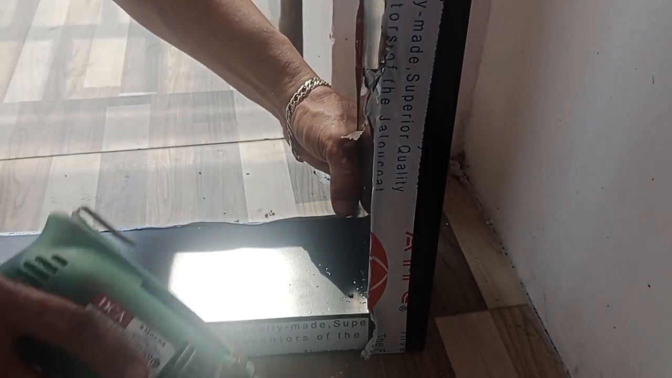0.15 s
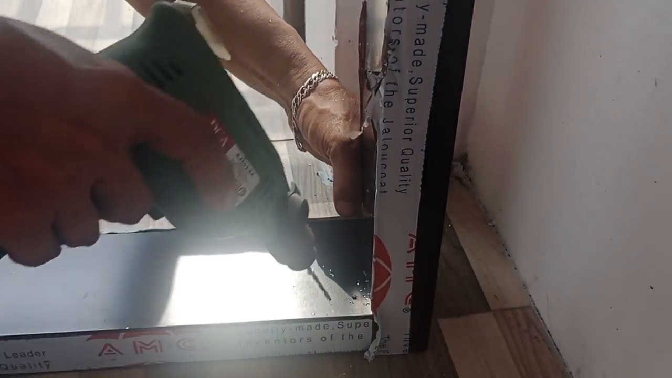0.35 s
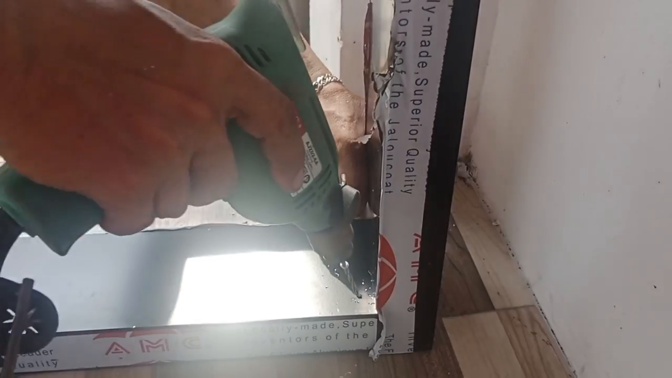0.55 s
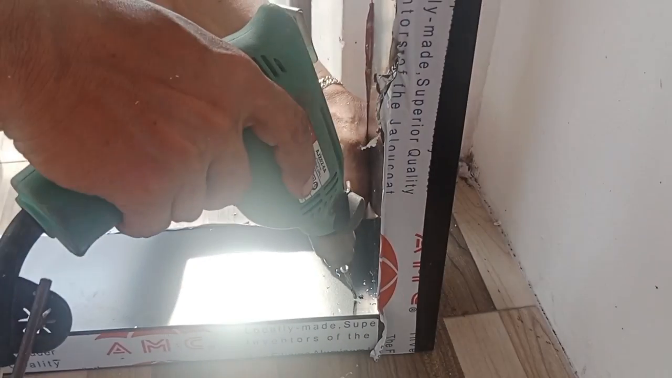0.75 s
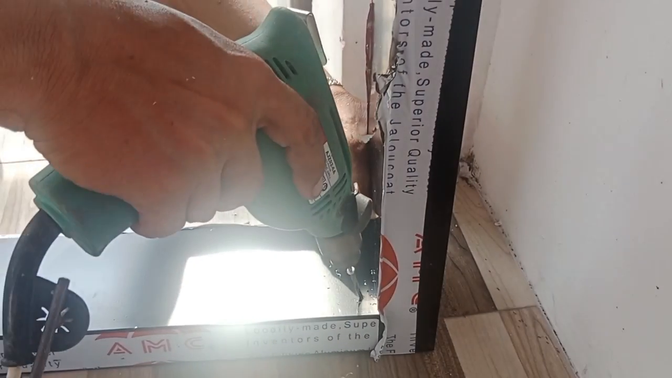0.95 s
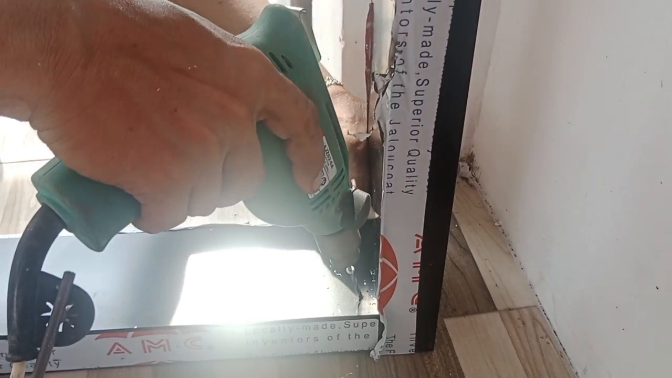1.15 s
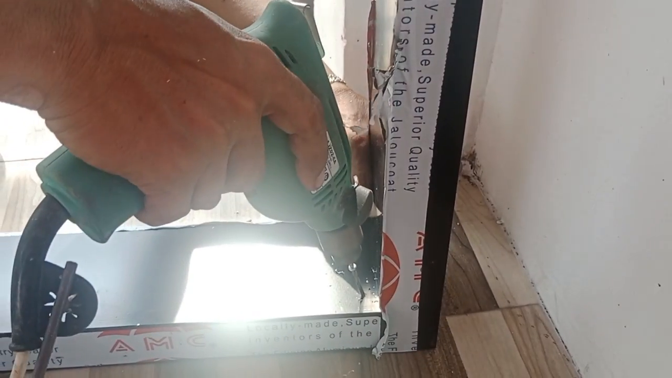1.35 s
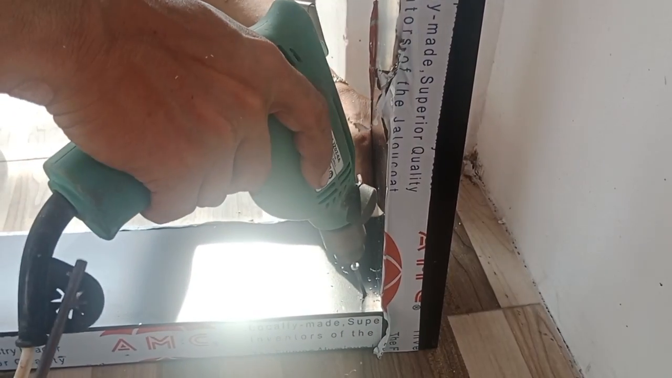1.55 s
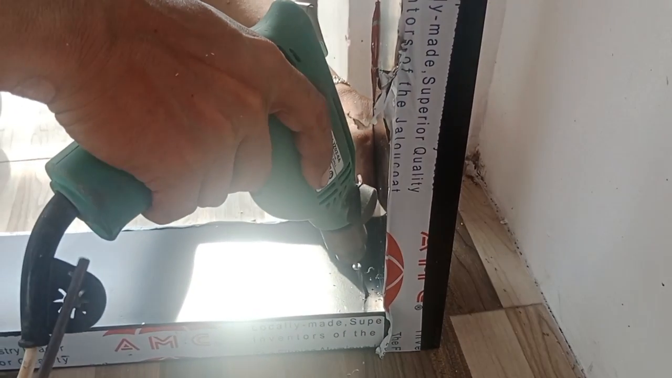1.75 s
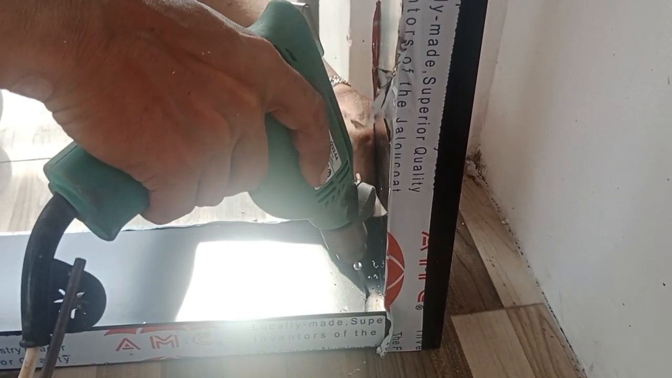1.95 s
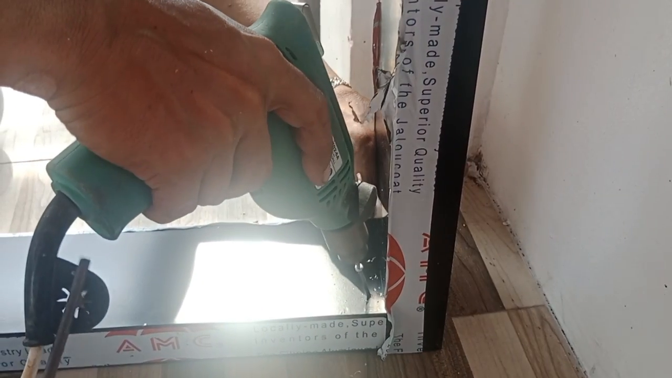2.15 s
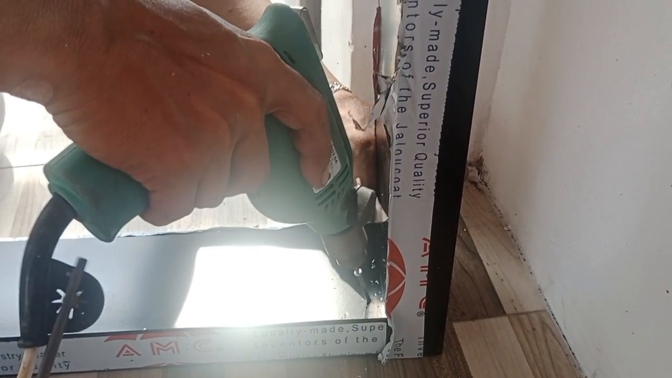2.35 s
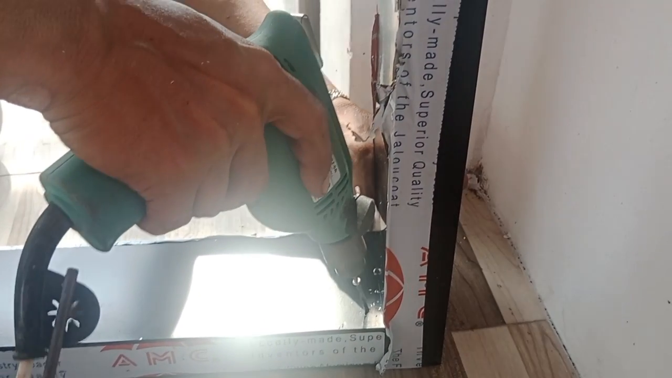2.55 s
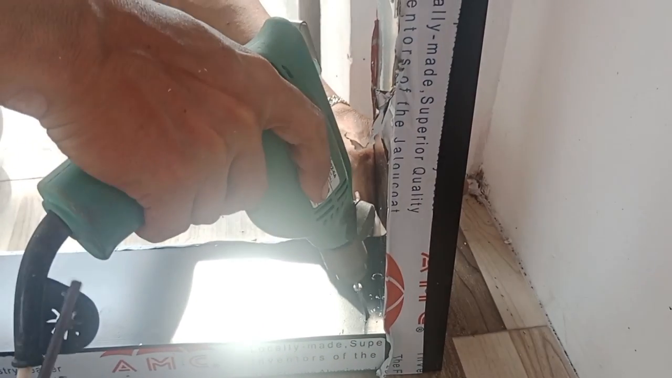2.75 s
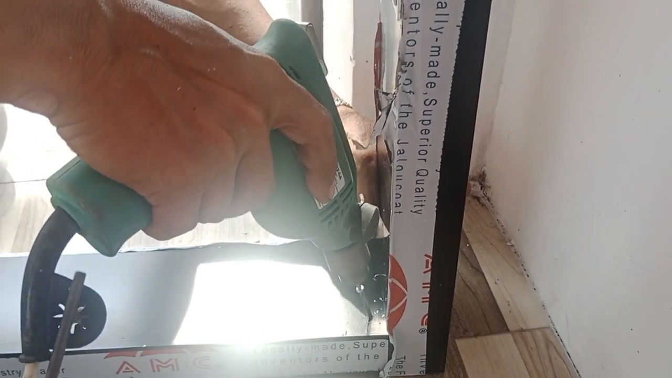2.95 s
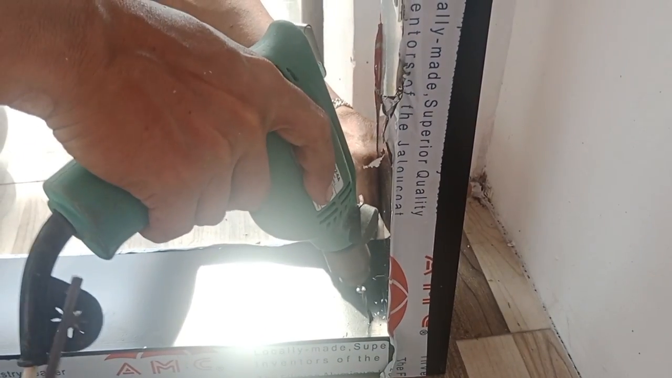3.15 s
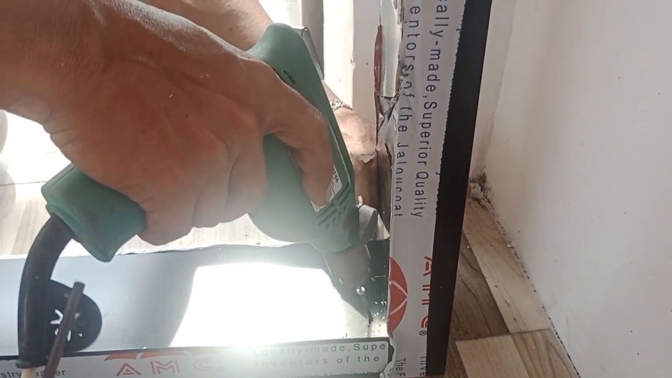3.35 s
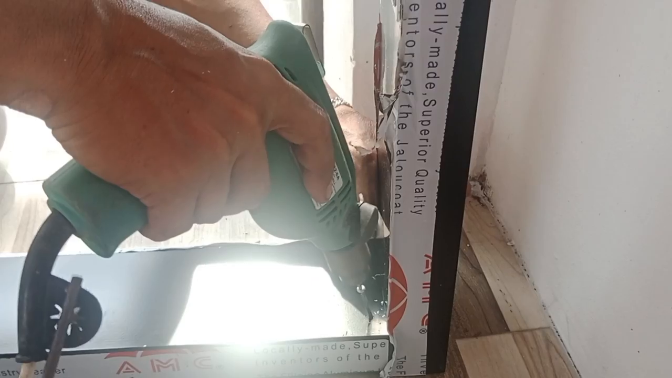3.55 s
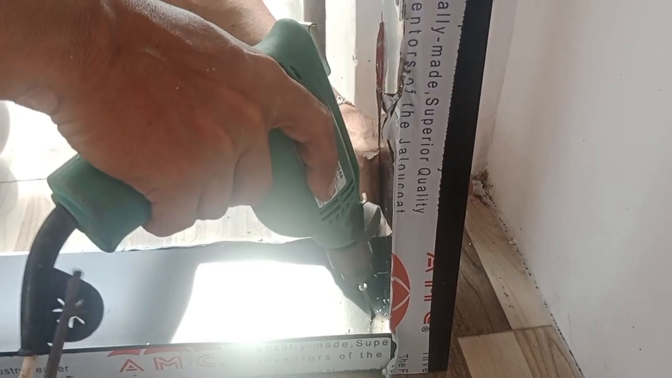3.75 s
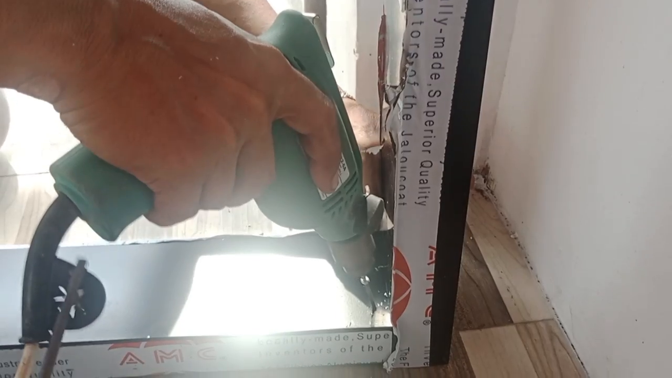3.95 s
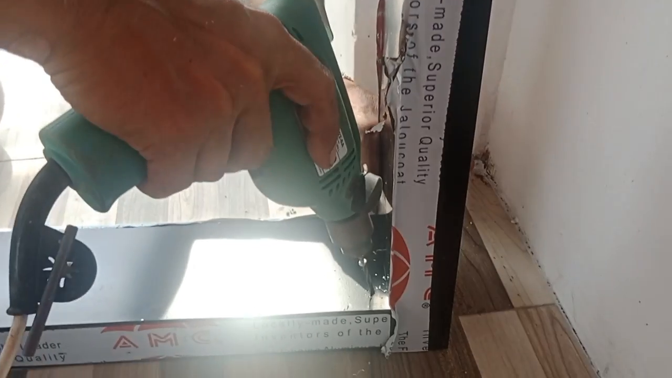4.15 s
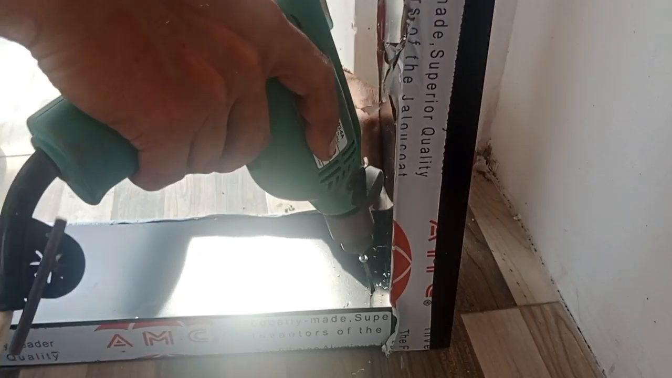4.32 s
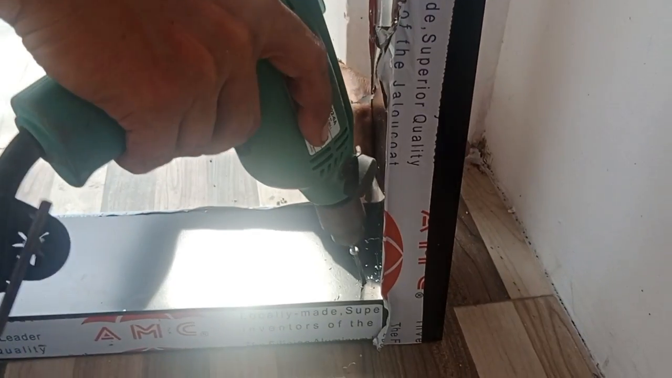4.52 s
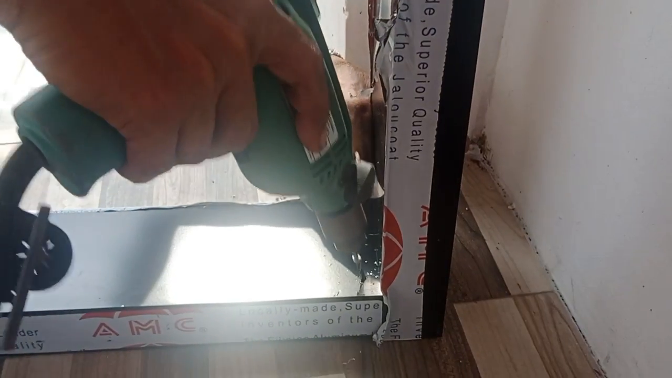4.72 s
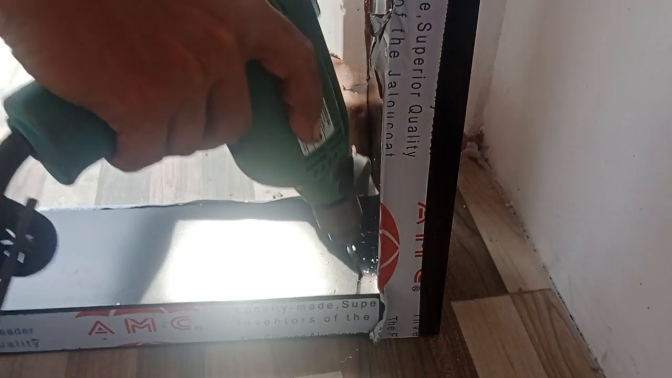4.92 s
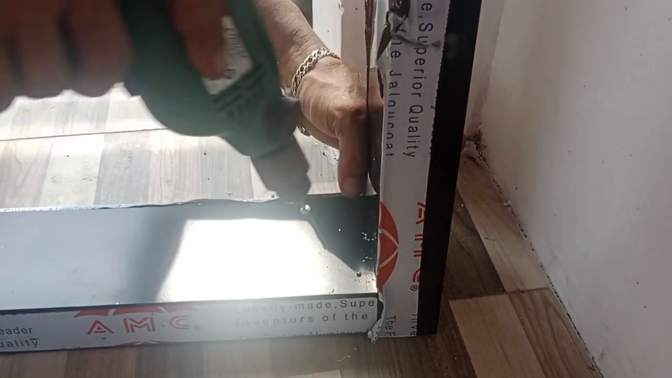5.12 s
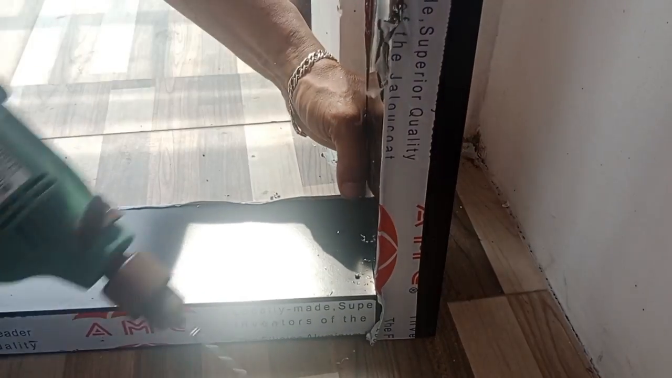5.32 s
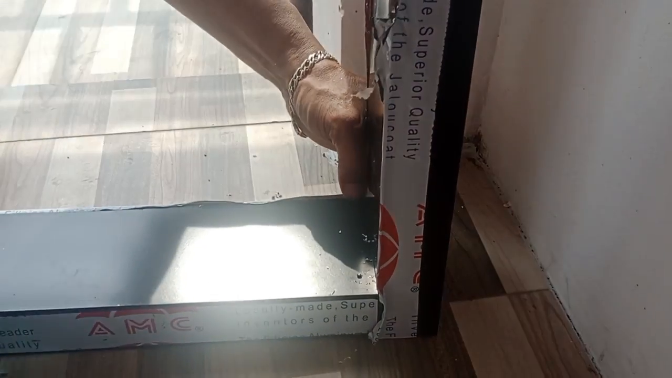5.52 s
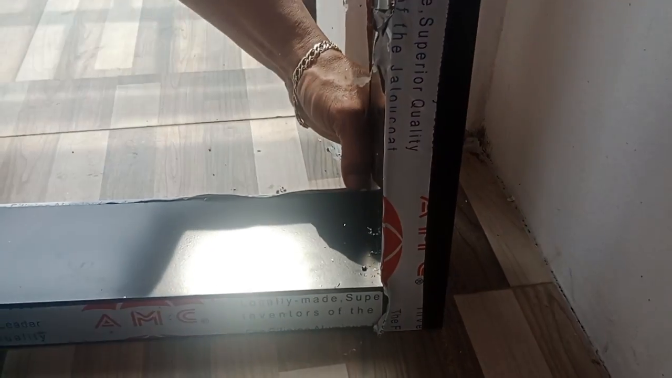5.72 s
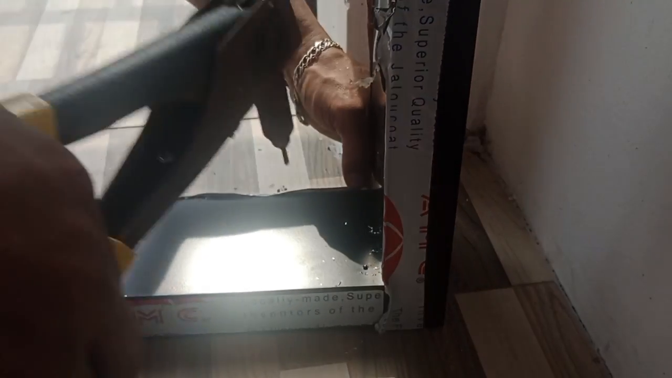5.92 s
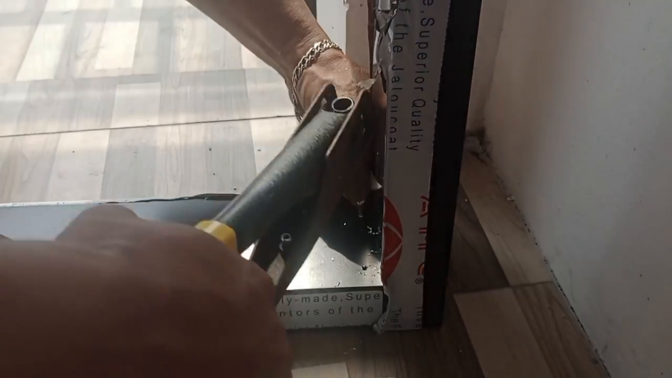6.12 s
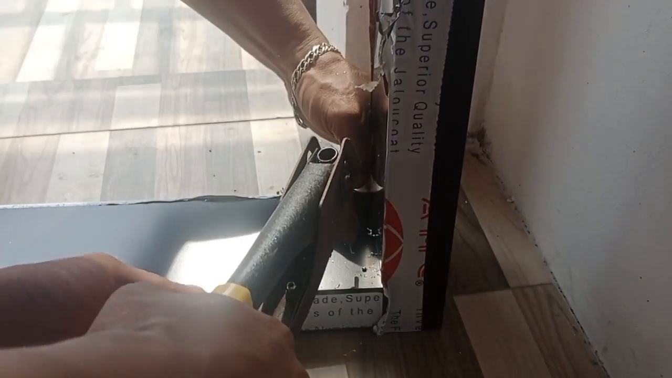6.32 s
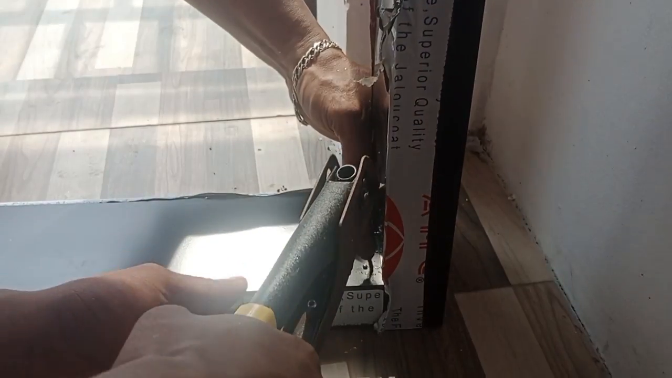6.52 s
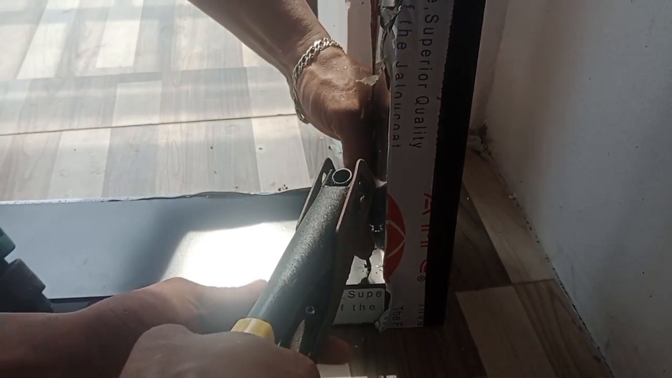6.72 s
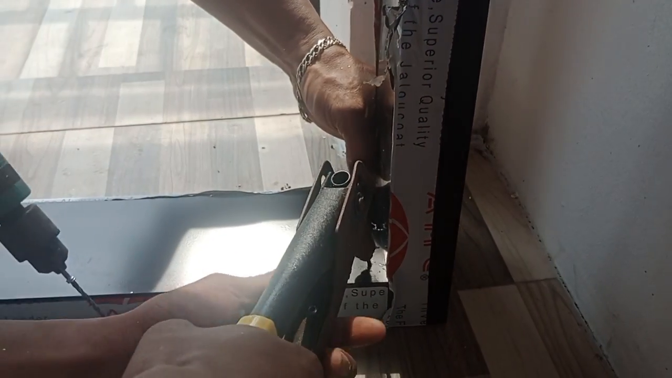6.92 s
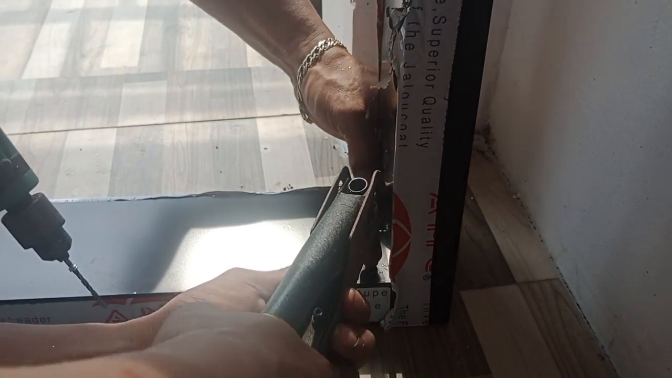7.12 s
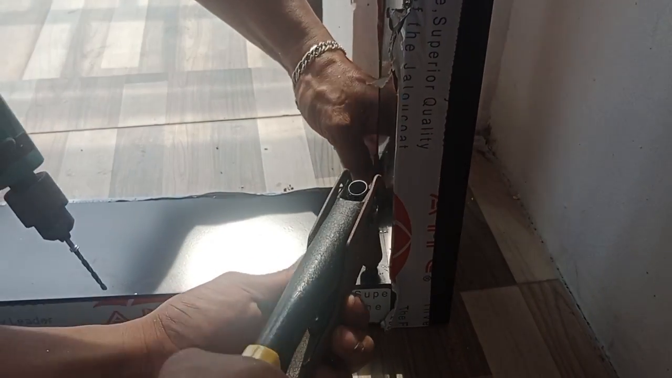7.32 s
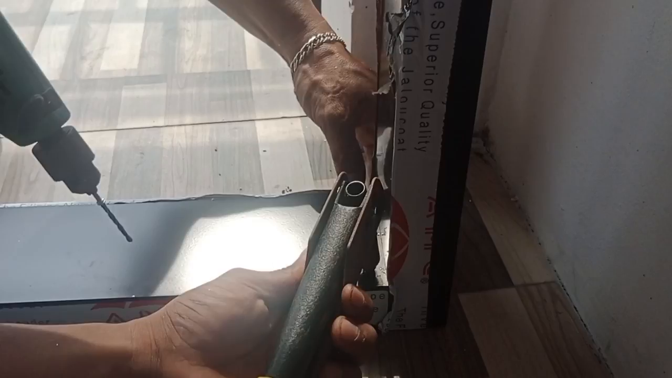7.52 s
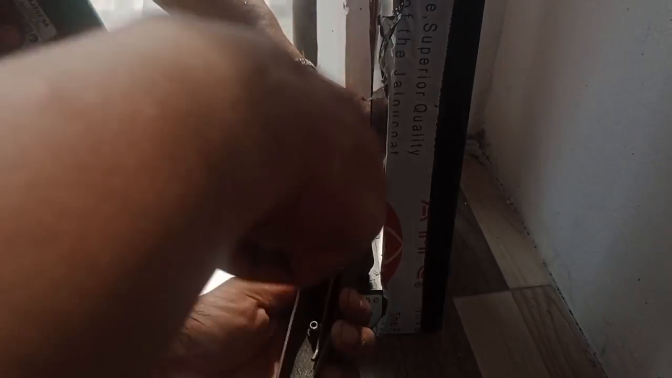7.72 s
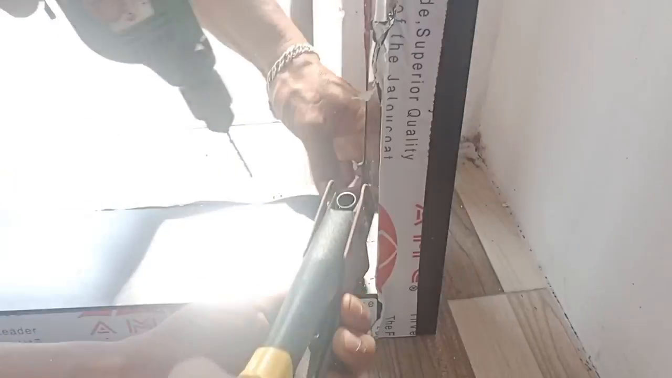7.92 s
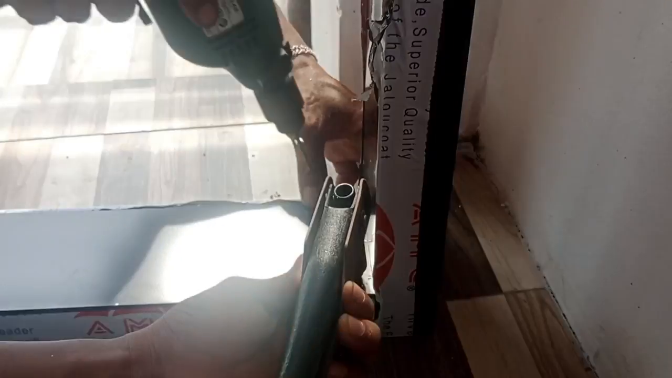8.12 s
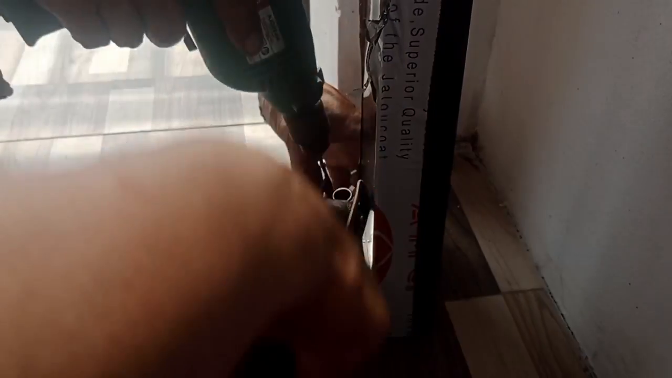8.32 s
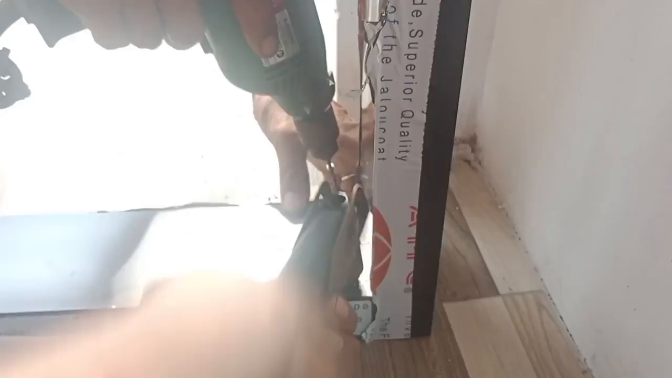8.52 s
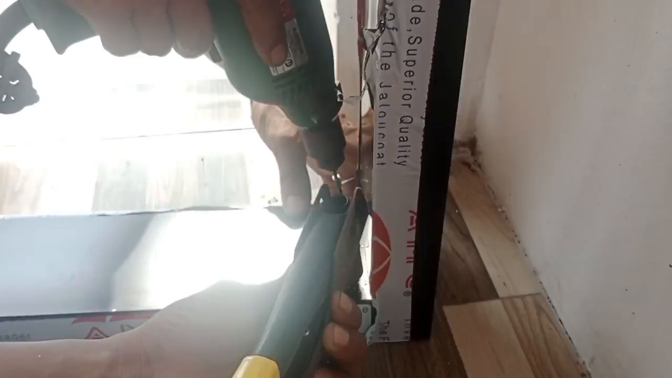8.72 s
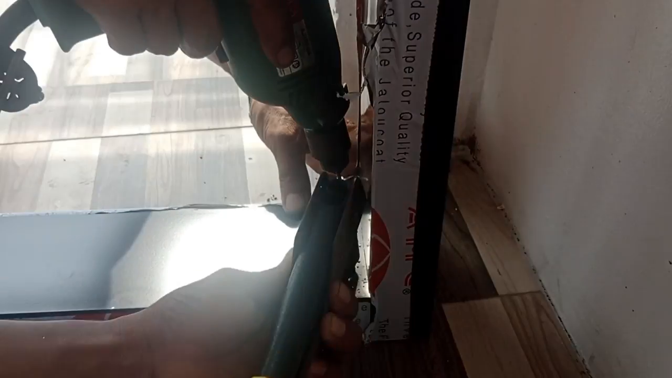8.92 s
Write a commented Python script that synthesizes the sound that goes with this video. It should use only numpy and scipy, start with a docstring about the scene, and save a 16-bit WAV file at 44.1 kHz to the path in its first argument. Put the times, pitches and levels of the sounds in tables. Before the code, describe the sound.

A small, hard, lively room, recorded close, with a quiet steady background. Light metallic taps and ticks at 0.1-0.4 s; at about 0.35 s a corded drill spins up quickly, a bright buzzing whine with brush scuff and fan hiss, then coasts. A tap at 0.7 and 0.9 s, soft handling rumble, and the bit begins to rub. From 1.4 to 4.9 s it bores into the hollow aluminium frame: repeated trigger surges near 1.45, 1.9, 2.8, 3.2, 3.8 and 4.3 s, each sagging afterwards, with rough chatter, droning growl, gear tones and short squeals around 2.7, 3.1, 3.7 and 4.1 s. At 5.05 s a knock and a last free rev, whirring down with gear rattle. Faint bumps and rubbing at 6.2-7.2 s. Riveter strokes clack, ring, judder and groan at 7.75, 7.95, 8.4 and 8.6 s; a sharp snap at 8.9 s.

```python
"""In a small hard room, a corded drill bores into a hollow aluminium door frame, heard close up.
Each trigger squeeze spins the motor up, then it coasts: pulsed whine, brush scuff and fan hiss through a housing.
Under load gear and bearing tones follow the shaft, and random chip impacts make the frame chatter.
The drill runs down; a hand riveter bumps the frame, and its handle is worked in two pairs of strokes.
Each stroke is a noise burst with rings, judder and a groan; at last the rivet's stem snaps."""
import sys
import numpy as np
from scipy import signal
from scipy.fft import rfft, irfft
from scipy.io import wavfile
from scipy.ndimage import uniform_filter1d, map_coordinates

SR = 44100
rng = np.random.default_rng(int(sys.argv[2]) if len(sys.argv) > 2 else 0)


def generate_wav(sig):
    """Save sig (samples, or channels by samples) to the path in sys.argv[1] as 16-bit PCM at SR."""
    pcm = np.round(np.clip(np.atleast_2d(sig).T, -1, 1) * 32767).astype(np.int16)
    wavfile.write(sys.argv[1], SR, pcm)


N = 395577
T = np.arange(N) / SR  # seconds
TOP_HZ = 15800  # upper limit of the whine and of the whole sound
WORK_SPEED = 150  # usual speed while boring (turns a second)
TEETH = 12  # motor pulses a turn
PRESS_RAMP_S = 0.48  # length of the fades as the bit is pressed in and eased off


def amp(db):
    """Decibels to gain."""
    return np.exp(np.asarray(db) * (np.log(10) / 20))


def unit(x):
    """Scale to rms 1."""
    return x / np.sqrt(np.mean(x ** 2) + 1e-20)


def along(points, hz):
    """(Hz, value) points read on a log frequency axis."""
    f, v = np.transpose(points)
    return np.interp(np.log(hz + 1), np.log(f + 1), v)


def wobble(rate):
    """A smooth random curve, rate knots a second."""
    knots = rng.standard_normal(int(N * rate / SR) + 4)
    coarse = T[::16]
    return np.interp(T, coarse, map_coordinates(knots, [coarse * rate]))


def swell(s, half_s):
    """A smooth bell around the time s, down to 1/e at half_s on either side."""
    return np.exp(-((T - s) / half_s) ** 2)


def grains(rate, spread_db):
    """Random tiny impacts of uneven size, about rate a second, rms 1."""
    sizes = rng.standard_normal(N) * amp(spread_db * rng.standard_normal(N))
    return unit(sizes * (rng.random(N) < rate / SR))


def filtered(x, response, size=32768, lead_count=2048):
    """x times a complex response of frequency."""
    impulse = np.roll(irfft(response(np.fft.rfftfreq(size, 1 / SR))), lead_count)
    return signal.fftconvolve(x, impulse)[lead_count:][:N]


def colour(points, hz):
    """Causal minimum-phase response with the shape of a spectrum and a power gain of 1."""
    cepstrum = irfft(np.log(unit(amp(along(points, hz))) + 1e-6))
    half = len(cepstrum) // 2
    cepstrum[1:half] *= 2
    cepstrum[half + 1:] = 0
    return np.exp(rfft(cepstrum))


def tones(orders, angle, jitter, flutter_db):
    """Shaft orders (multiple of the motor speed, dB), each trembling in strength, all with one phase jitter."""
    swing = angle + jitter * wobble(250)
    total = 0
    for k, db in orders:
        flutter = flutter_db * (wobble(35) + 0.56 * wobble(8))
        total = total + np.sqrt(2) * amp(db + flutter) * np.sin(k * swing)
    return total


def ringing(rows, rise_s, waver, count=60):
    """Damped resonances (s, Hz, dB, t60 s) whose pitch wavers as the contact slips."""
    out, t = np.zeros(N + SR), T[:SR // 2]
    for s, hz, db, t60 in rows:
        drift = np.interp(t, np.linspace(0, t[-1], count), rng.standard_normal(count))
        envelope = amp(db - 60 * t / t60) * (1 - np.exp(-t / rise_s))
        out[round(s * SR):][:len(t)] += envelope * np.sin(2 * np.pi * hz * t + waver * drift)
    return out[:N]


def shifting(x, depth_db, size=1024):
    """As the point of contact moves, different resonances come forward."""
    z = signal.stft(x, nperseg=size)[2]
    field = uniform_filter1d(rng.standard_normal(z.shape), size=4, axis=0)
    field = uniform_filter1d(field, size=7, axis=1)
    return signal.istft(z * unit(amp(depth_db * unit(field))), nperseg=size)[1][:N]


# The hollow frame's resonances. Each row: centre in Hz, width in Hz, relative level in dB.
FRAME_MODES = [(124.3, 5.4, 4.5), (168.5, 14, -3), (216.7, 16, -5.5), (289, 60, -0.5), (363.5, 42, 5.5),
               (560, 72, 4), (672, 24, 1), (748, 20, 2.5), (886, 24, 5.5), (1023, 22, 2), (1220, 25, -7.5),
               (1853, 290, 1.5), (2072, 270, 10), (2530, 62, 4), (3000, 110, -6.5)]


def through_frame(x, points, broad=0.52):
    """A force of the given spectrum rings the frame's resonances, over a broad direct part."""
    def response(hz):
        modes = broad
        for c, w, db in FRAME_MODES:
            modes = modes + amp(db) * 1j * hz * w / (c * c - hz * hz + 1j * hz * w)
        h = colour(points, hz) * modes
        return h / np.sqrt(np.mean(np.abs(h) ** 2))
    return filtered(x, response)


# Colour of the background. Each row: frequency in Hz, relative level in dB per Hz.
QUIET_SPECTRUM = [(30, -14.5), (90, 0.5), (250, 2.5), (750, -19), (2200, -10), (3300, -16.5), (5200, -33.5),
                  (7700, -2), (15800, -49)]


def background(floor_db):
    """The quiet background is steady coloured noise."""
    return amp(floor_db) * filtered(rng.standard_normal(N), lambda hz: colour(QUIET_SPECTRUM, hz))


# How long the room rings. Each row: frequency in Hz, decay time t60 in seconds.
ROOM_DECAY = [(100, 0.32), (400, 0.29), (2000, 0.38), (7000, 0.33), (15000, 0.2)]


def room(x, wet_db=-4):
    """Tiled floor and bare walls: each frequency dies at its own speed."""
    hz, t, z = signal.stft(rng.standard_normal(SR * 2 // 3), SR, nperseg=256)
    decay = amp(-60 * t / along(ROOM_DECAY, hz)[:, None])
    tail = signal.istft(z * decay, SR, nperseg=256)[1]
    tail = np.pad(tail / np.linalg.norm(tail), (150, 0))  # the echoes start 150 samples late
    echo = signal.fftconvolve(x, tail)[:N]
    return (x + amp(wet_db) * echo) / np.sqrt(1 + amp(wet_db) ** 2)


HANDS_ON_S, HANDS_OFF_S = 0.82, 6.5  # hands hold the frame between these times (s)
# Colour of the hands' rumble. Each row: frequency in Hz, relative level in dB per Hz.
RUMBLE_SPECTRUM = [(30, -17.5), (60, -30.5), (85, 5), (130, -6.5), (220, -8.5), (500, -33.5)]
# The hands shift their grip. Each row: time of the peak in seconds, level in dB.
GRIP_SHIFTS = [(0.83, -40.5), (1.2, -43), (5.52, -42)]


def handling(hands_db=-54, wander_db=3, fade_s=0.46, grip_s=0.056):
    """Hands and cord drag on the frame with a soft low rumble that swells as the grip shifts."""
    idle = np.maximum(HANDS_ON_S - T, 0) + np.maximum(T - HANDS_OFF_S, 0)
    level = amp(hands_db + wander_db * wobble(11.0)) * np.exp(-idle / fade_s)
    level += sum(amp(db) * swell(s, grip_s) for s, db in GRIP_SHIFTS)
    bumps = grains(rate=400, spread_db=3)
    return filtered(level * bumps, lambda hz: colour(RUMBLE_SPECTRUM, hz))


SNAG_THUD_DB, SNAG_TICK_DB, BUMP_TICK_DB = -37, -10, -13  # relative to their clack
TAKE_UP_S = .021  # the click of slack leads the stroke by this much
STROKE_THUD_DB, STROKE_TICK_DB, TAKE_UP_TICK_DB = -22, -8, -5  # relative to their clack
RATTLE_S, RATTLE_LOSS_DB = 0.015, 5  # the loose jaws strike again: usual first gap (s), loss each time
# Light taps on the frame and snags of the bit in the hole. Each row: start in seconds, relative clack in dB.
TAPS_AND_SNAGS = [(0.118, -17.5), (0.184, -34), (0.225, -23.5), (0.365, -28), (0.383, -17), (0.684, -12.5),
                  (0.9215, -12), (2.663, -8.5), (4.454, -9.5), (4.7766, -8.5), (7.051, -34), (7.515, -50),
                  (7.686, -47), (7.7, -34.5), (8.361, -27)]
# Drill and riveter bump the frame. Each row: start in seconds, relative thud in dB, relative clack in dB,
# lower resonance in Hz, its level in dB, upper resonance in Hz, its level in dB.
FRAME_BUMPS = [(5.047, -8, -8, 283, -4.5, 910, -8.5), (6.2366, -19.5, -41, 154, -19, 527, -14),
               (6.275, -25, -38, 155, -15.5, 903, -26), (6.304, -30.5, -24, 196, -32, 1390, -22),
               (6.6215, -29, -21.5, 264, -16, 1450, -36), (6.657, -28.5, -30, 296, -30, 445, -34),
               (6.937, -35, -34, 542, -28, 1065, -26.5), (7.0769, -14, -19, 277, -15, 1555, -23),
               (7.19, -27.5, -31.5, 604, -26, 890, -40), (8.179, -43, -29.5, 603, -37, 2100, -32)]
# Strokes of the riveter's handle. Each row: start in seconds, relative clack in dB, relative take-up click in dB,
# delay of the judder's peak in seconds, relative judder in dB, ring in Hz, groan in Hz.
HANDLE_STROKES = [(7.744, -7, -20.5, 0.09, -20, 1203, 570), (7.943, -10, -23.5, 0.05, -14.5, 1880, 597),
                  (8.399, -6.5, -11, 0.077, -16.5, 1062, 365), (8.6028, -8.5, -28, 0.043, -12, 1304, 367)]
# The rivet's stem snaps. One row: start in seconds, then relative clack, thud and tick in dB.
STEM_SNAP = (8.8915, -2, -12.5, -11.5)


def contacts(count=3):
    """Blows on the frame as (s, clack dB, thud dB, tick dB); a slack click leads each stroke, a rattle follows."""
    rows = [(s, db, db + SNAG_THUD_DB, db + SNAG_TICK_DB) for s, db in TAPS_AND_SNAGS]
    rows += [(s, clack, thud, clack + BUMP_TICK_DB) for s, thud, clack, *_ in FRAME_BUMPS]
    for s, db, click, *_ in HANDLE_STROKES:
        rows.append((s - TAKE_UP_S, click, click + STROKE_THUD_DB, click + TAKE_UP_TICK_DB))
        rows.append((s, db, db + STROKE_THUD_DB, db + STROKE_TICK_DB))
        for k in range(1, count + 1):
            # the gaps tend to widen, as k multiplies them
            s, db = s + k * RATTLE_S * rng.uniform(.6, 1.4), db - RATTLE_LOSS_DB
            rows.append((s, db, db + STROKE_THUD_DB, db + STROKE_TICK_DB))
    return rows + [STEM_SNAP]


def blows(times, levels_db, t60, attack, scuff_db, scuff_s, crack_db):
    """Each knock is a rising scuff, a sharp crack, then a burst of rattling contacts."""
    envelope = np.zeros(N + SR)
    t = np.arange(-(SR // 8), SR // 3) / SR
    after = np.maximum(t, 0)
    rise = 1 - np.exp(-after / attack) + amp(scuff_db) * np.exp(np.minimum(t, 0) / scuff_s)
    shape = amp(-60 * after / t60) * rise
    shape += (t > 0) * amp(crack_db - 60 * after / 0.012)
    for s, db in zip(times, levels_db):
        envelope[round(s * SR):][:len(t)] += amp(db) * shape
    rattle = grains(rate=7000, spread_db=-2) * unit(amp(3.0 * wobble(250)))
    return envelope[SR // 8:][:N] * rattle


BUMP_RING_S = 0.099  # t60 of a bump's two resonances
STROKE_RING_DB, STROKE_RING_S = -16, 0.17  # a stroke's ring, relative to its clack; t60, also of the snap
GROAN_DB, GROAN_S = -22.5, 0.36  # the judder's groan; its t60
# Resonances that the snap favours. Each row: frequency in Hz, level in dB.
SNAP_RESONANCES = [(140, -20.5), (1310, -14), (1900, -16)]


def contact_rings():
    """Bumps, strokes and the snap each ring their own resonances; a stroke's judder groans at one pitch."""
    rows, groans = [], []
    for s, _, _, low, low_db, high, high_db in FRAME_BUMPS:
        rows += [(s, low, low_db, BUMP_RING_S), (s, high, high_db, BUMP_RING_S)]
    for s, db, _, delay, _, ring_hz, groan_hz in HANDLE_STROKES:
        rows.append((s, ring_hz, db + STROKE_RING_DB, STROKE_RING_S))
        groans.append((s + delay, groan_hz, GROAN_DB, GROAN_S))
    rows += [(STEM_SNAP[0], hz, db, STROKE_RING_S) for hz, db in SNAP_RESONANCES]
    return ringing(rows, rise_s=0.0049, waver=1.0) + ringing(groans, rise_s=.015, waver=1.2)


JUDDER_RISE_DB_PER_S, JUDDER_FALL_DB_PER_S = 403, 222
# The riveter is shifted along the frame. Each row: time of the peak in seconds, relative level in dB.
RIVETER_SHIFTS = [(6.3, -35), (6.955, -32.5), (7.125, -33), (7.23, -41)]


def judder():
    """Envelope of the riveter's drag on the frame: it swells after each stroke's clack and at each shift."""
    swells = RIVETER_SHIFTS + [(s + delay, db) for s, _, _, delay, db, *_ in HANDLE_STROKES]
    level = 0
    for s, db in swells:
        drop_db = np.maximum(JUDDER_RISE_DB_PER_S * (s - T), JUDDER_FALL_DB_PER_S * (T - s))
        level = level + amp(db - drop_db)
    return level


# Colours of the blows and the drag. Each row: frequency in Hz, relative level in dB per Hz.
THUD_SPECTRUM = [(30, -39.5), (90, -5), (160, -8), (290, 3.5), (560, -2.5), (800, -18.5), (2000, -18),
                 (5000, -66)]
CLACK_SPECTRUM = [(300, -37.5), (700, -1.5), (1200, 7), (2000, -1.5), (2800, 4.5), (3800, -2.5),
                  (4800, -19), (7000, -55)]
TICK_SPECTRUM = [(4000, -23.5), (5000, -3), (6000, -7.5), (7700, -0.5), (9000, -9), (10000, -11),
                 (13000, -13), (13800, -22.5), (15800, -21.5)]
RUB_SPECTRUM = [(50, -25), (120, -1.5), (350, -4), (560, -1.5), (750, -12), (1500, -14.5), (3000, -41)]
# A loose metal part left ringing. Each row: start in seconds, frequency in Hz, level in dB, t60 in seconds.
LOOSE_RINGS = [(0.224, 735, -41.5, 0.55)]


def tools(thud_db=2, clack_db=-8.0, tick_db=0, slide_db=-2):
    """Tools strike the frame with a clack, a thud and a bright tick; the riveter judders along it."""
    times, clacks, thuds, ticks = np.transpose(contacts())
    thud = blows(times, thuds + thud_db, t60=0.093, attack=0.0048, scuff_db=-25.0, scuff_s=0.041, crack_db=-5.5)
    thud = through_frame(thud, THUD_SPECTRUM, broad=0.97)
    clack = blows(times, clacks + clack_db, t60=0.12, attack=0.00069,
                  scuff_db=-40.5, scuff_s=0.064, crack_db=-10.5)
    clack = through_frame(clack, CLACK_SPECTRUM, broad=1.0)
    tick = blows(times, ticks + tick_db, t60=0.044, attack=0.0013, scuff_db=-32, scuff_s=0.0027, crack_db=-4.5)
    tick = filtered(tick, lambda hz: colour(TICK_SPECTRUM, hz))
    drag = amp(slide_db) * judder() * grains(rate=440, spread_db=-1.0)
    rub = through_frame(drag, RUB_SPECTRUM, broad=0.39)
    rings = 0
    for s, hz, db, t60 in LOOSE_RINGS:
        decay = (T > s) * amp(db - 60 * np.abs(T - s) / t60)
        rings = rings + decay * np.sin(2 * np.pi * hz * (T - s))
    return thud + shifting(clack + rub, depth_db=3.5) + tick + rings + contact_rings()


SPIN_UP_S, FRICTION_SPEED = .09, 300  # motor lag (s); speed at which drag equals friction (turns a second)
TOUCH_S, TOUCH_DRAG = 1.05, .065  # the bit first rubs and brakes the coasting motor: (s, added drag per s)
# Squeezes of the trigger. Each row: start in seconds, time held in seconds,
# speed the motor heads for in turns a second, drag once released per second.
TRIGGER_SQUEEZES = [(0.355, .161, 305, .272), (1.445, .177, 201, .089), (1.867, .167, 228.8, .363),
                    (2.756, .087, 194.3, .338), (3.219, .1, 211.5, .397), (3.78, .105, 201, .446),
                    (4.26, .109, 198.8, .403), (5.039, .125, 309, .29)]


def rotor():
    """Turns a second: each squeeze pulls the motor towards a speed, then drag and friction slow it."""
    speed = np.zeros(N)
    for s, held, goal, drag in TRIGGER_SQUEEZES:
        start = round(s * SR)
        since = T[:N - start]
        driven = goal + (speed[start] - goal) * np.exp(-np.minimum(since, held) / SPIN_UP_S)
        rubbing = (s < TOUCH_S) * TOUCH_DRAG * np.maximum(s + since - TOUCH_S, 0)
        slowing = np.exp(-drag * np.maximum(since - held, 0) - rubbing)
        speed[start:] = np.maximum((driven + FRICTION_SPEED) * slowing - FRICTION_SPEED, 0)
    return speed


HEAVY_DB, FEED_FADE_DB_PER_S = -16.5, 222  # effort of a deep bite; fade while the bit is off the metal
# How hard the bit cuts. Each row: time in seconds, effort in dB before the deep bite's is taken off.
FEED_EFFORT = [(0.849, -53), (1.3, -27), (1.46, -32.5), (1.5, -17.5), (2.06, -17.5), (2.77, -32),
               (2.81, -21.5), (3.22, -30.5), (3.32, -21.5), (3.81, -30.5), (3.83, -25), (4.89, -26.5),
               (4.93, -32)]


def effort():
    """Cutting effort in dB relative to a deep bite, dying away while the bit is off the metal."""
    s, db = np.transpose(FEED_EFFORT)
    away = np.maximum(s[0] - T, 0) + np.maximum(T - s[-1], 0)
    return np.interp(T, s, db) - HEAVY_DB - FEED_FADE_DB_PER_S * away


# One shaft tone swells. Each row: time of the peak in seconds, level in dB, half length in seconds.
TONE_SURGES = [(4.774, -21.5, 0.015), (5.3, -30.5, 0.047)]
# The tone of each surge, as multiples of the motor speed.
SURGE_MULTIPLES = [18, 12]


def surges(angle):
    """One shaft tone at a time stands out briefly, following the motor speed."""
    total = 0
    for k, (s, db, half_s) in zip(SURGE_MULTIPLES, TONE_SURGES):
        total = total + swell(s, half_s) * tones([(k, db)], angle, jitter=0.02, flutter_db=6.5)
    return total


def scuff(angle, speed, count=100, size=4096):
    """The brushes ride over the same worn surface on every turn."""
    harmonics = np.exp(2j * np.pi * rng.random(count)) * (np.arange(count) > TEETH)
    surface = unit(irfft(harmonics, size))
    turn = angle / (2 * np.pi) % 1
    return np.sqrt(speed * count * 2 / SR) * np.interp(turn, np.arange(size) / size, surface)


# Colour of the slack gears' rattle. Each row: frequency in Hz, relative level in dB per Hz.
GEARBOX_SPECTRUM = [(500, -17), (1000, -6.5), (1400, 9.5), (2000, 2.5), (3000, 11.5), (3900, -4),
                    (5000, -35.5)]


def coasting(speed, angle, rattle_db=-39, full_speed=127, steepness=2.1, chuck_ratio=0.093, gear_db=-39,
             whine_db=-55, case_db=-23, case_hz=1240, case_width_hz=190):
    """Slack gears rattle with each turn of the chuck, hum and ring their case; the motor's whine lingers."""
    level = np.minimum(speed / full_speed, 1) ** steepness
    chuck = amp(3 * np.sin(chuck_ratio * angle) + 2 * wobble(25))
    teeth = unit(grains(rate=700, spread_db=3) * chuck)
    hum = tones([(8, gear_db)], angle, jitter=.1, flutter_db=4)
    # the case radiates no low tones
    hum = filtered(hum, lambda hz: (hz / case_hz) ** 8 / (1 + (hz / case_hz) ** 8))
    # the motor's whine, 36 and 48 times its speed, lingers down to the last turns
    whine = tones([(36, whine_db), (48, whine_db)], angle, jitter=.025, flutter_db=4)
    knocking = amp(case_db) * (speed / WORK_SPEED) ** 2 * (teeth + scuff(angle, speed))
    case = filtered(knocking, lambda hz: np.exp(-((hz - case_hz) / case_width_hz) ** 2))
    rattle = through_frame(amp(rattle_db) * level * teeth, GEARBOX_SPECTRUM, broad=0.89)
    return shifting(rattle + case, depth_db=3) + level * hum + np.sqrt(level) * whine


# Force of a deep bite. Each row: frequency in Hz, relative level in dB per Hz.
SHAKE_SPECTRUM = [(40, -21.5), (85, -12), (130, 1), (220, -4), (400, 0), (900, -38.5)]
# The frame's droning resonances. Each row: frequency in Hz, level at a deep bite in dB.
FRAME_DRONES = [(127, -35), (295, -28), (750, -28)]


def growl(feed_db, shake_db=-24, shake_grows=2.2, drone_grows=1.0):
    """A deep bite jolts the whole frame and keeps its sharpest resonances droning."""
    jolts = amp(shake_db + shake_grows * feed_db) * grains(rate=700, spread_db=1)
    drone = 0
    for hz, db in FRAME_DRONES:
        drone = drone + amp(db + 3.2 * wobble(16)) * np.sin(2 * np.pi * hz * T + .9 * wobble(22))
    return through_frame(jolts, SHAKE_SPECTRUM, broad=0.31) + amp(drone_grows * feed_db) * drone


FULL_LOAD_S = 1.85  # middle of the fade as the full load is taken up
# Force of the flutes, and of the chips. Each row: frequency in Hz, relative level in dB per Hz.
CHATTER_SPECTRUM = [(40, -29), (120, -17), (290, 4), (420, -3), (740, 5), (1500, -15), (2500, -50.5)]
GRIND_SPECTRUM = [(280, -34.5), (500, -6.5), (850, -6), (1900, -8), (3700, -21), (4800, -3.5), (6500, -45)]
# Gear and bearing tones under load, as multiples of the motor speed.
LOAD_MULTIPLES = [12, 24, 36, 48, 52.3, 55.4, 60]
# Relative levels of those gear and bearing tones in dB.
LOAD_LEVELS = [-2.5, -5.5, -13, -11.5, -9.5, -11, -10.5]
# Extra gear and bearing tones of a deep bite, as multiples of the motor speed.
BITE_MULTIPLES = [18, 36, 52.3, 55.4]
# How those extra tones enter. Each row: relative level in dB, middle of the fade-in in seconds.
BITE_ENTRIES = [(-7.5, 1.71), (-7.5, 1.4), (-12.5, 0.98), (-10, 0.79)]
# How the gear case radiates the tones. Each row: frequency in Hz, gain in dB.
GEAR_CASE_GAIN = [(900, -24), (1300, 3), (1600, -1.5), (1950, 3), (2500, 2), (3250, 2), (3950, -2.5),
                  (4500, -14), (6000, -5), (7800, 1.5), (10000, -8.5), (15000, -18.5)]
# The bit catches and squeals. Each row: start in seconds, frequency in Hz, level in dB, t60 in seconds.
BIT_SQUEALS = [(2.66, 2220, -11, 0.16), (3.07, 2140, -15.5, 0.31), (3.675, 2185, -13.5, 0.5),
               (4.07, 353.6, -15, 0.64)]


def cutting(speed, angle, pressed, feed_db, flute_ratio=0.467, flute_db=3.0, chatter_db=-18, grind_db=-21,
            load_db=-24.0, bite_db=-17, chatter_grows=0.86, grind_grows=0.48, bite_grows=2.4,
            throb_db=4, throb_ratio=.16, speed_grows=0.15):
    """Each flute tears off chips that shake the frame, the bit squeals, loaded gears and bearings sound."""
    chatter = amp(chatter_db + chatter_grows * feed_db) * (speed / WORK_SPEED) ** speed_grows
    grind = amp(grind_db + grind_grows * feed_db)
    flutes = unit(amp(flute_db * np.sin(flute_ratio * angle + wobble(30)) + 1.31 * wobble(40)))
    tears = grains(rate=2500, spread_db=2.5)
    body = through_frame(chatter * flutes * tears, CHATTER_SPECTRUM)
    crumbs = grains(rate=1100, spread_db=3.5)
    chips = shifting(through_frame(grind * flutes * crumbs, GRIND_SPECTRUM, broad=0.68), depth_db=1.5)

    def from_time(s):
        return np.clip((T - s) / PRESS_RAMP_S + .5, 0, 1)

    # gear and bearing tones tremble in level; a deep bite adds further ones
    load_tones = tones(zip(LOAD_MULTIPLES, LOAD_LEVELS), angle, jitter=0.032, flutter_db=3.0)
    loaded = amp(load_db) * from_time(FULL_LOAD_S) * load_tones
    strained = 0
    for k, (db, s) in zip(BITE_MULTIPLES, BITE_ENTRIES):
        strained = strained + from_time(s) * tones([(k, db)], angle, jitter=0.0091, flutter_db=2.0)
    bite = amp(bite_db + bite_grows * np.minimum(feed_db, 0)) * strained
    # the mesh tightens once per turn of the big gear
    throb = unit(amp(throb_db * np.sin(throb_ratio * angle + wobble(11))))
    song = filtered(pressed * throb * (loaded + bite), lambda hz: amp(along(GEAR_CASE_GAIN, hz)))
    return body + chips + ringing(BIT_SQUEALS, rise_s=0.004, waver=1.46) + song


def airflow(speed, pressed, free_db=-21, knee_speed=150, steepness=3.61, strain_db=-18.0, strain_grows=0.54,
            unsteady_db=2.0):
    """Fan and brushes grow louder with speed, levelling off at the top; strain adds to them."""
    free = amp(free_db) * (speed / np.hypot(speed, knee_speed)) ** steepness
    strain = amp(strain_db) * pressed * (speed / WORK_SPEED) ** strain_grows
    return np.hypot(free, strain) * amp(unsteady_db * wobble(12))


# Colour of the drill's housing. Each row: frequency in Hz, relative level in dB per Hz.
HOUSING_SPECTRUM = [(150, -17.5), (450, -18), (600, -9), (1000, -2.5), (1230, 0.5), (1700, -5), (2700, -9),
                    (3900, -13.5), (4800, -19), (5800, -13.5), (7800, -5), (8900, -9.5), (9400, -13.5),
                    (13100, -20), (13700, -26), (15800, -27)]


def motor(speed, angle, pressed, pulling, tone_db=3.5, hiss_db=-7, loaded_hiss_db=3, scuff_db=-2, load_db=-13.0,
          pull_db=-7, rolloff_db=-0.03, cutoff_hz=2600, off_centre=0.18, count=10):
    """Twelve pulses a turn from an off-centre rotor, brush scuff and fan hiss sound through the housing."""
    swing = angle + .008 * wobble(420) + .006 * wobble(70)
    pulse_hz = TEETH * speed
    # early and late once a turn: sidebands
    pulse_angle = TEETH * (swing + .029 * (1 + .4 * wobble(18)) * np.sin(angle))
    whine = 0
    for k in range(1, count + 1):
        fading = amp(2.6 * wobble(35) + 1.8 * wobble(7) + 2.5 * wobble(160) - 1)
        in_band = k * pulse_hz < TOP_HZ
        whine = whine + np.cos(k * pulse_angle) * in_band * amp(rolloff_db * k) * fading
    whine *= 2 * np.sqrt(pulse_hz / SR) * (1 + off_centre * np.sin(angle))
    whine *= amp(load_db * pressed + pull_db * pulling)
    # small vents radiate only the high tones
    whine = filtered(whine, lambda hz: hz ** 4 / (hz ** 4 + cutoff_hz ** 4))
    hiss = grains(rate=9000, spread_db=-2.0) * (1 + 0.041 * np.cos(angle))  # the brushes spark once a turn
    hiss *= unit(amp(0.92 * wobble(70)))
    sound = amp(tone_db) * whine + amp(hiss_db + loaded_hiss_db * pressed) * hiss
    sound += amp(scuff_db) * (1 - .5 * pressed) * scuff(swing, speed)
    return filtered(airflow(speed, pressed) * sound, lambda hz: colour(HOUSING_SPECTRUM, hz))


BITE_S, EASE_OFF_S = 1.32, 5.004  # the bit is pushed into the metal between these times (middle of each fade)


def drill():
    """One rotor speed and angle drive the motor, the cutting, the gears and the surges; effort the growl."""
    steady = rotor()
    speed = steady * (1 + 0.001954 * wobble(25))
    angle = 2 * np.pi * np.cumsum(speed) / SR
    pulling = np.clip(np.gradient(steady) * SR * SPIN_UP_S / WORK_SPEED, 0, 1)  # the motor is speeding up
    pressed = np.clip(np.minimum(T - BITE_S, EASE_OFF_S - T) / PRESS_RAMP_S + .5, 0, 1)
    feed_db = effort()
    sound = motor(speed, angle, pressed, pulling) + cutting(speed, angle, pressed, feed_db)
    return sound + growl(feed_db) + coasting(speed, angle) + surges(angle)


def scene(floor_db=-63):
    """Drill and tools in the room, over its quiet background, the same on both sides."""
    mono = background(floor_db) + handling() + room(tools(), wet_db=-3.0) + room(drill(), wet_db=-6.0)
    return np.array([mono, mono])


def record(dry, notch_hz=4800, notch_width_hz=420, notch_db=-22, bass_hz=48):
    """Peaks are rounded off; the microphone port thins the bass and swallows a narrow band; the treble ends."""
    def port(hz):
        notch = amp(notch_db * np.exp(-((hz - notch_hz) / notch_width_hz) ** 2))
        return notch * hz ** 2 / (hz ** 2 + bass_hz ** 2) * (hz < TOP_HZ)
    rounded = dry / (1 + np.abs(dry) ** 6) ** (1 / 6)
    return np.array([filtered(side, port) for side in rounded])


dry = scene()
out = record(dry)
generate_wav(out)
```